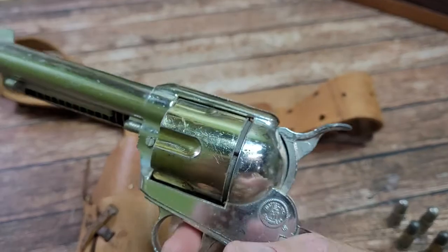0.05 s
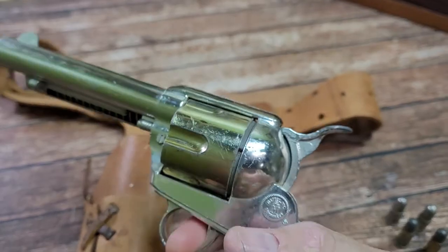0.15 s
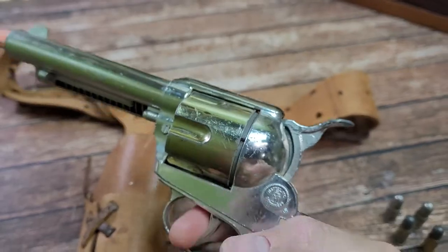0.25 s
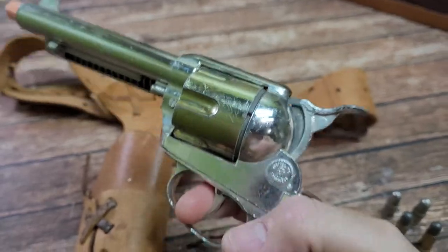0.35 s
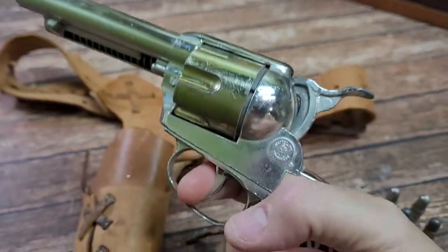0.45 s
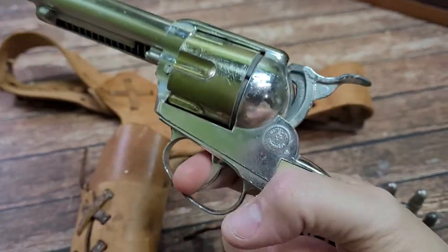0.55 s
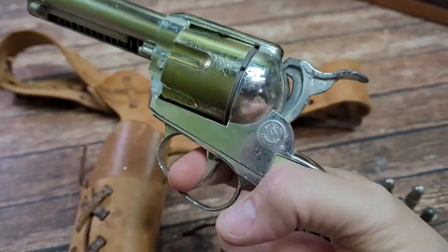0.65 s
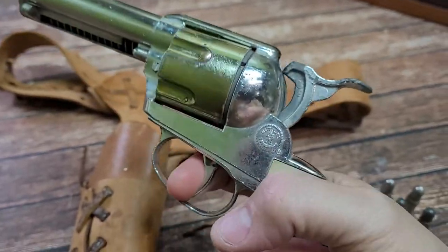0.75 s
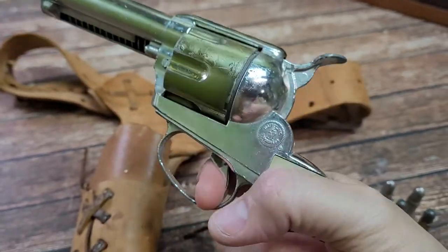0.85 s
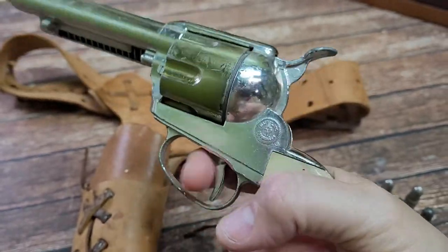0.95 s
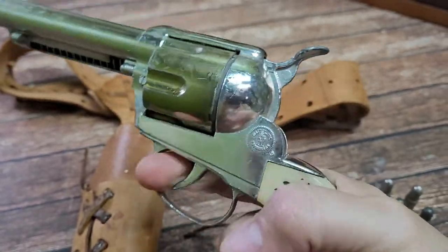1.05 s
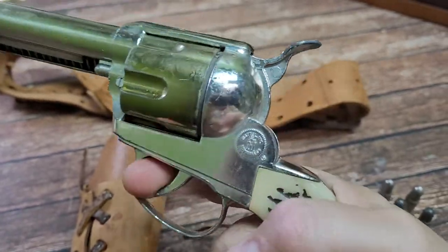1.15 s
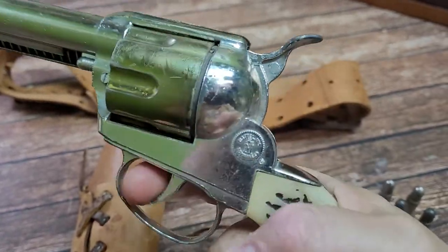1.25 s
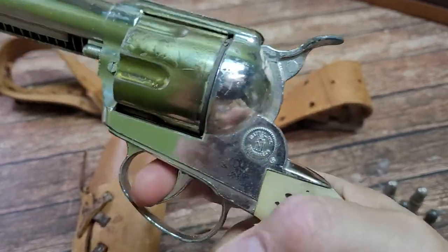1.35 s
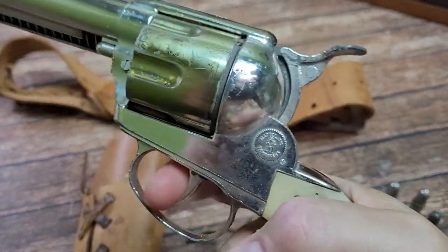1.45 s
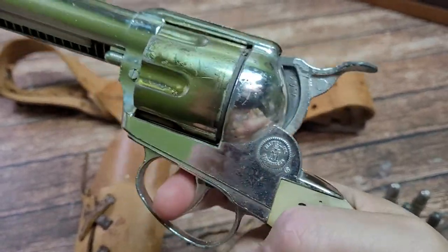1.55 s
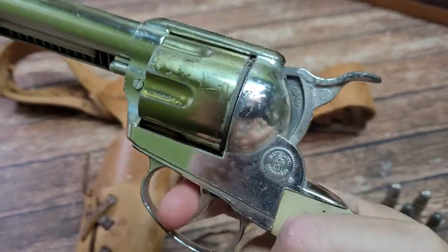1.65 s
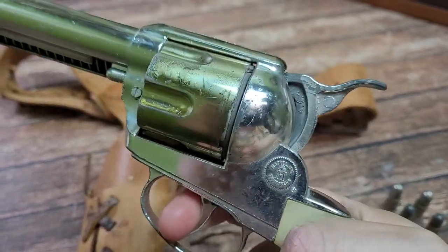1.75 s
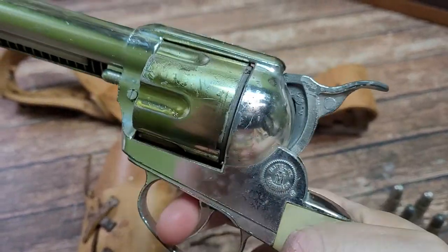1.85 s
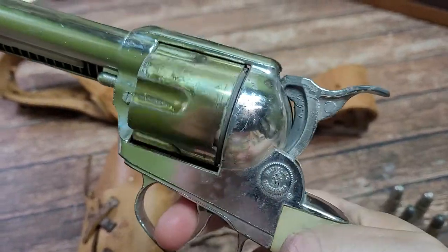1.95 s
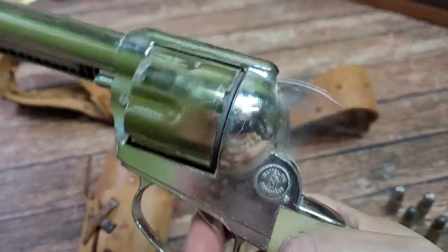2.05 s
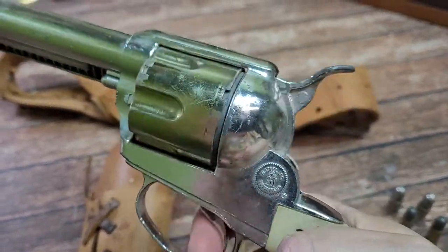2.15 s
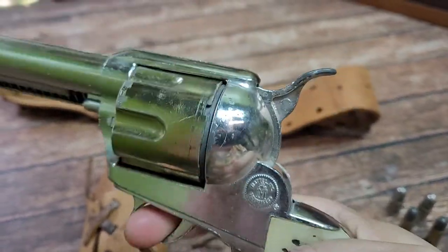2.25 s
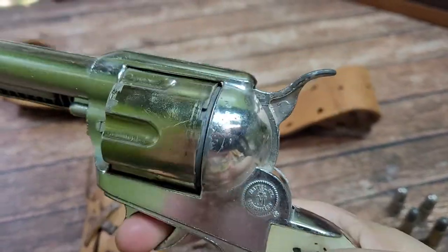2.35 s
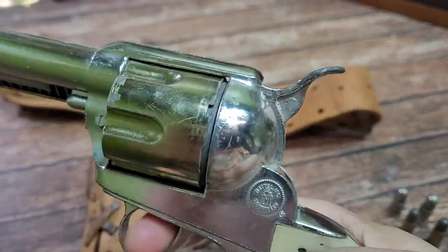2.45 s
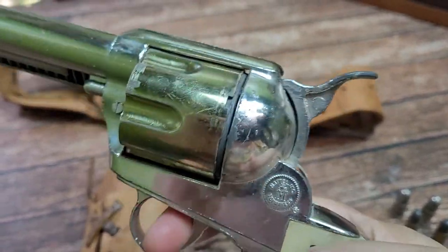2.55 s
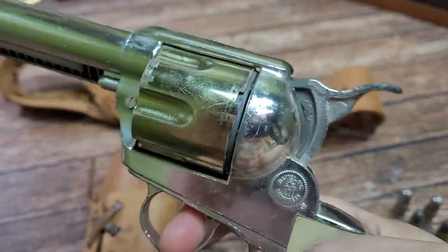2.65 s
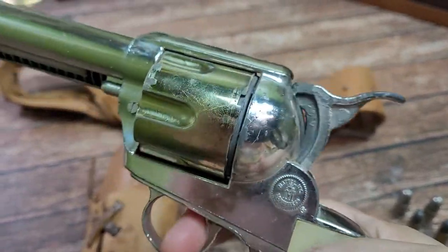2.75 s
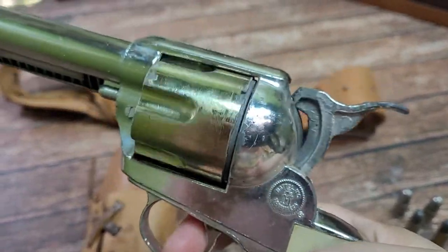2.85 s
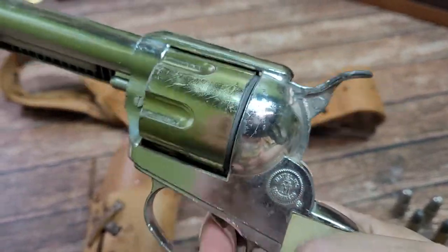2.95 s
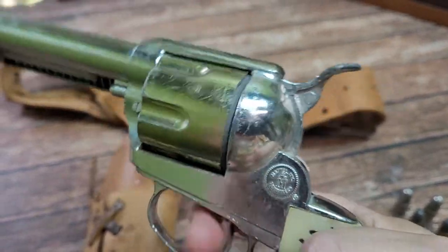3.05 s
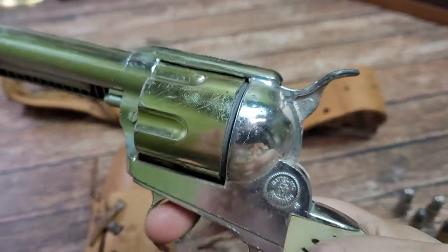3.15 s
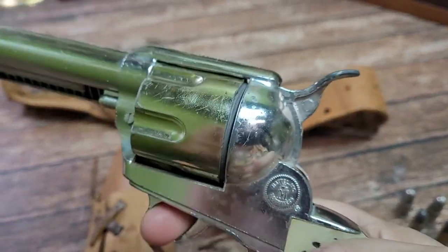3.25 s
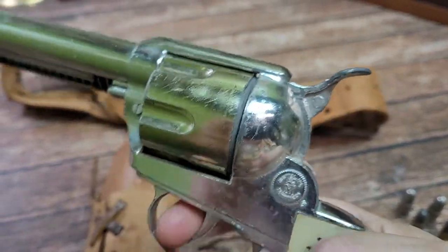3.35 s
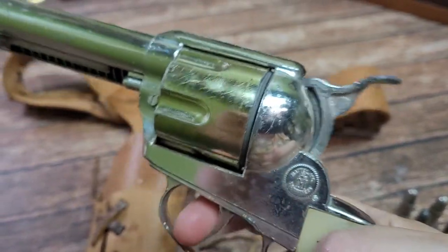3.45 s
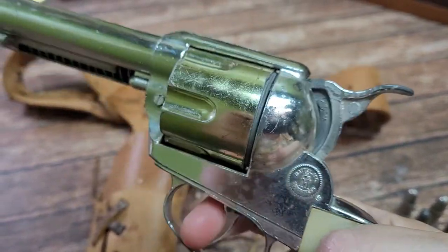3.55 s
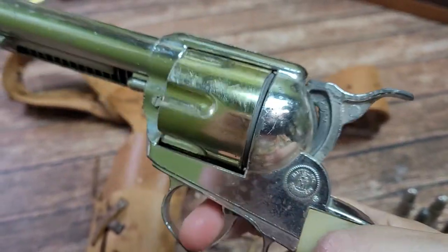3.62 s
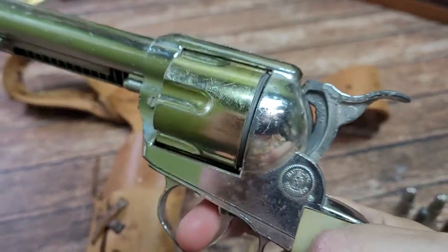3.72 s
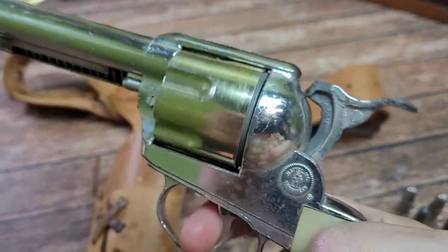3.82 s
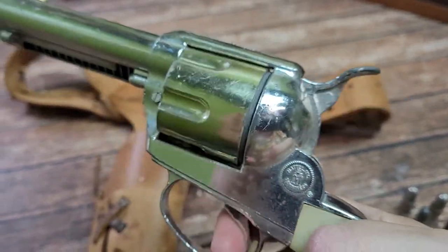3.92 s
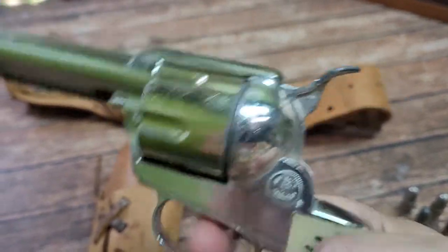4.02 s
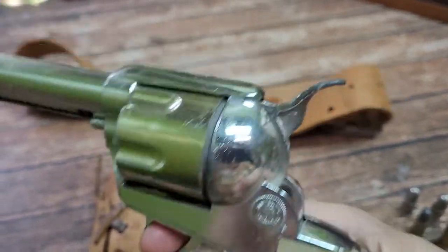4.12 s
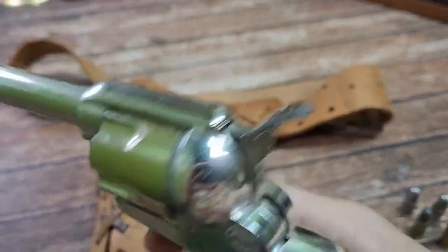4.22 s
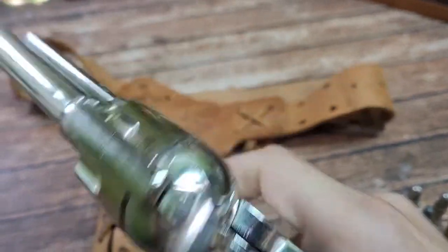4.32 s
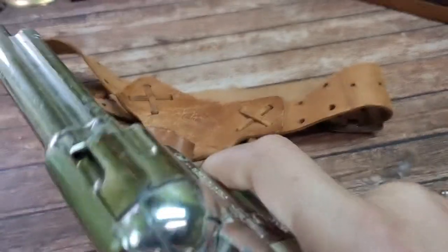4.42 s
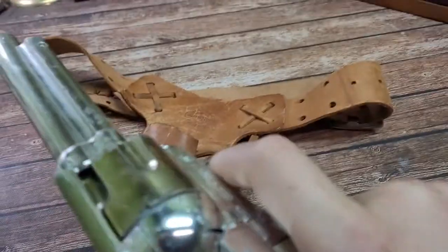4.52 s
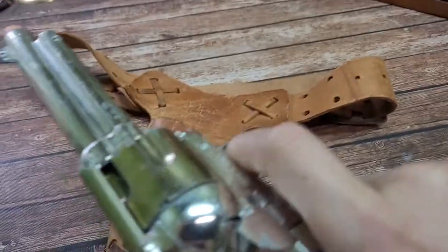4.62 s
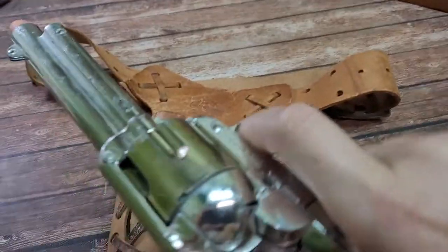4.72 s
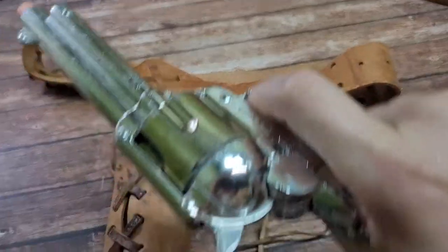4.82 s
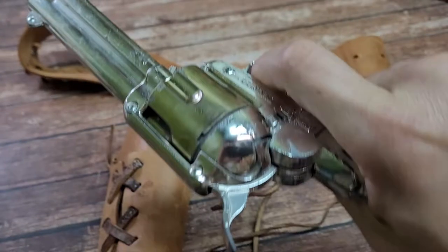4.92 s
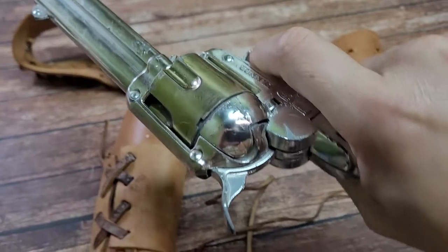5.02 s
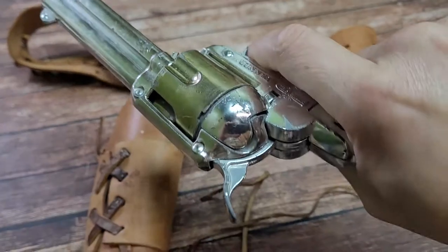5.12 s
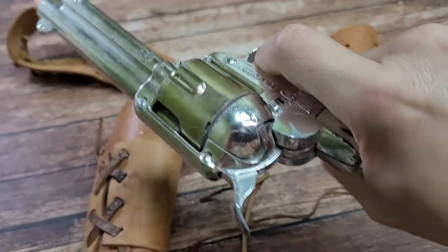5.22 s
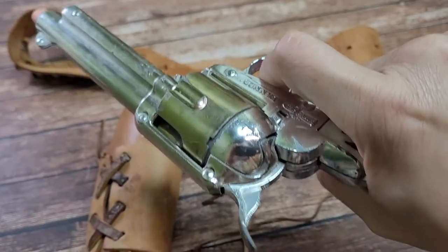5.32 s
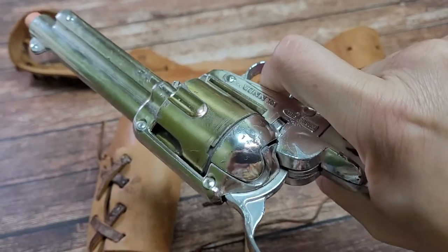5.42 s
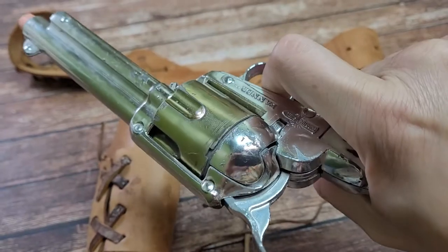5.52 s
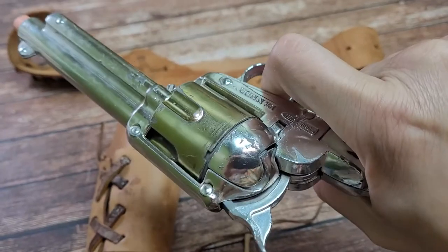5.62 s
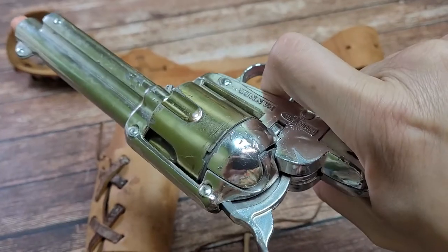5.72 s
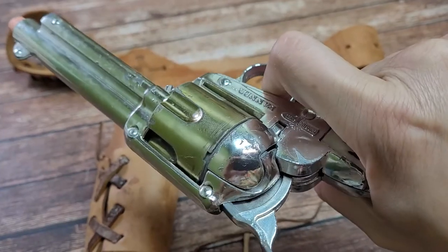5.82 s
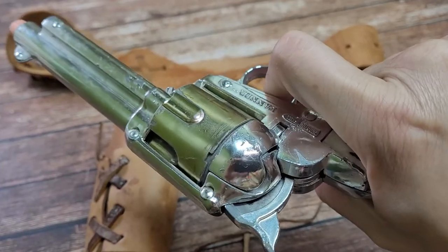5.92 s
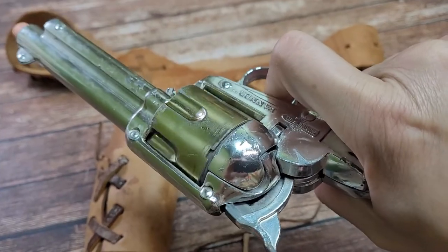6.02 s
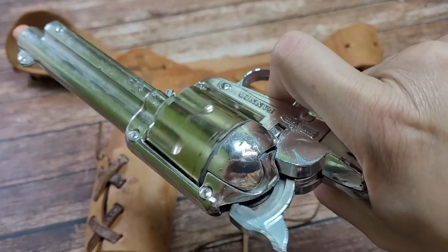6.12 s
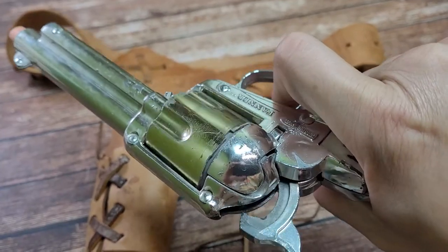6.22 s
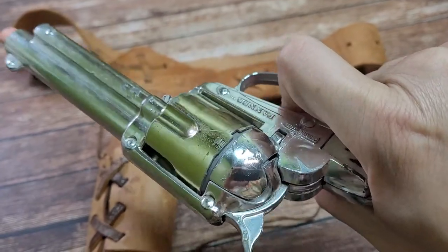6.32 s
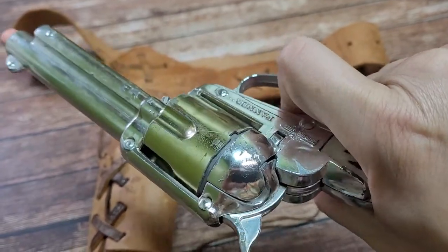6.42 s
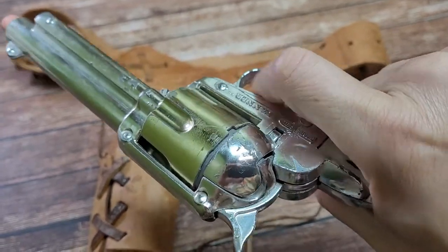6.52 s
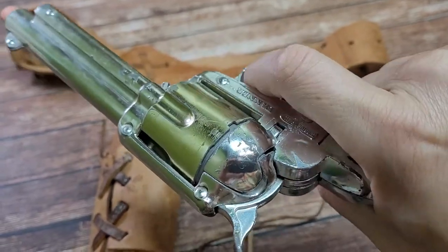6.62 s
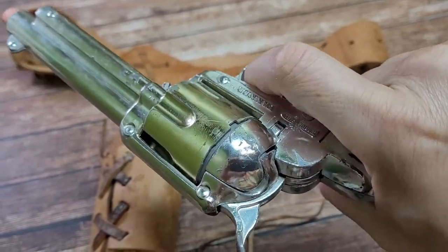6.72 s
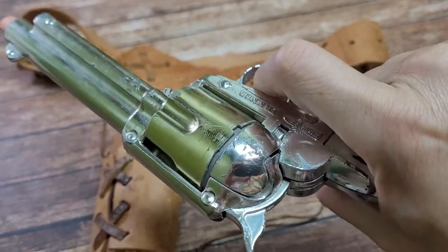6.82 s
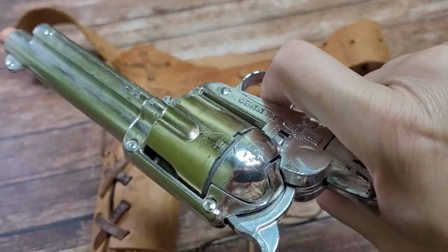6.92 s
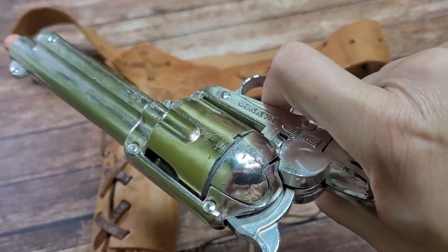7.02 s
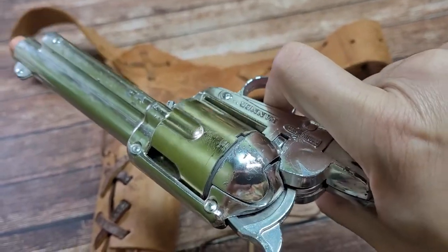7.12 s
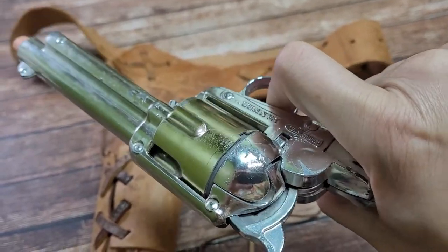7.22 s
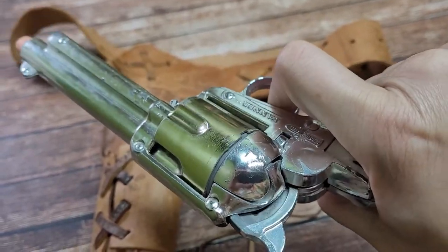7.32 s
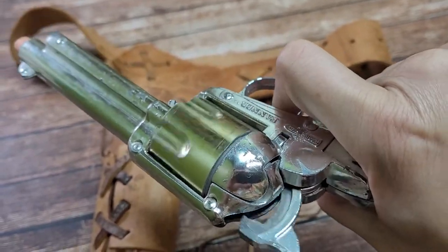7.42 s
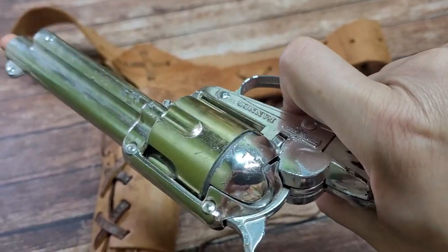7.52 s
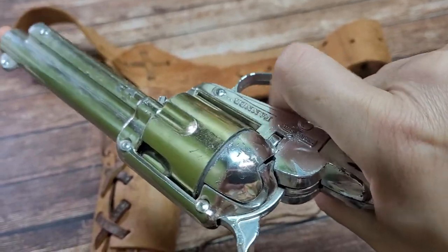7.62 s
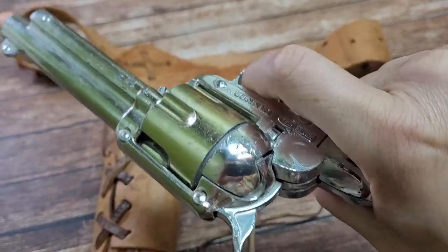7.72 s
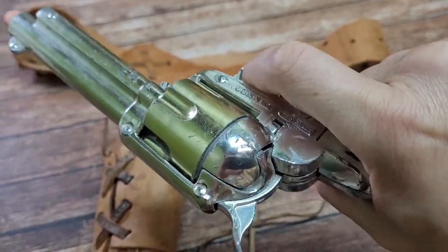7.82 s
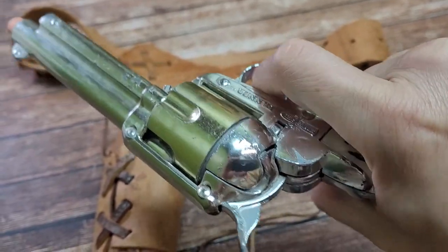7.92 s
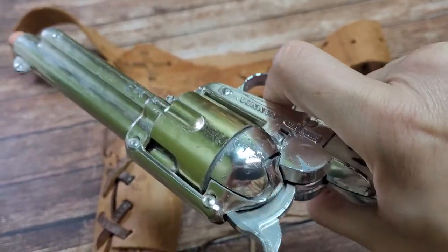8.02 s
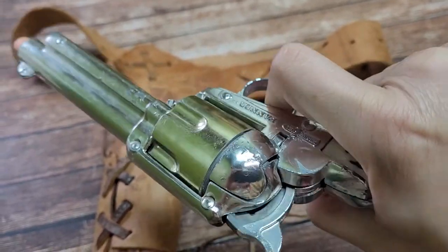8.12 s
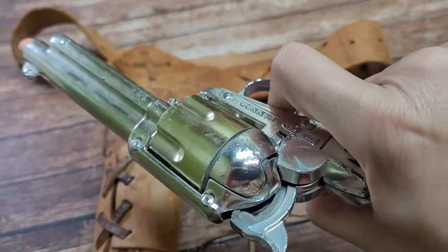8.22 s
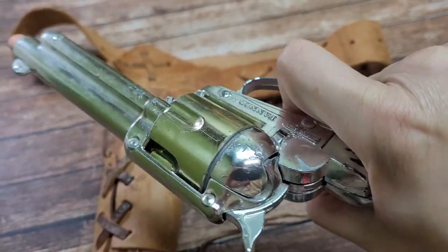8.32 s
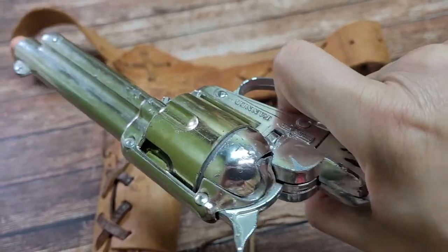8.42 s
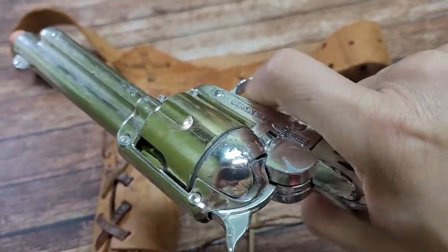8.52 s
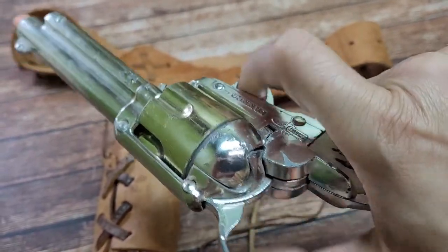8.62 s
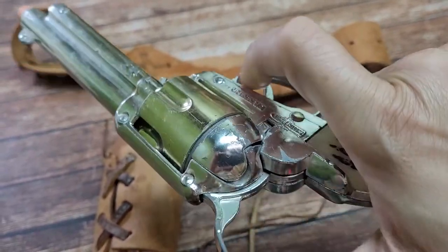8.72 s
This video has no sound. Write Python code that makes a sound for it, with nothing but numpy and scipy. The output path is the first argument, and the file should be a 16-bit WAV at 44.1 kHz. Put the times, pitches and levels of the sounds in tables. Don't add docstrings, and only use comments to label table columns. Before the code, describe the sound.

Close to a phone microphone in a small room, a die-cast toy revolver is dry-fired seven times: four snaps, a long quiet pause, then three more. Each is a loud, bright metallic crack with a tiny rebound rattle and short room tail, followed by little scraping clicks and a firm clack as the trigger returns. Skin rubs faintly on metal over low rumble and throbbing hum.

```python
import sys
import numpy as np
from scipy import signal
from scipy.fft import rfft, irfft
from scipy.io import wavfile
from scipy.ndimage import uniform_filter1d

SR = 44100
rng = np.random.default_rng(int(sys.argv[2]) if len(sys.argv) > 2 else 0)


def nominal_scale(level):
    x = np.asarray(level, float) / 20
    return 10 ** x


def output_pcm(signal):
    pcm = np.clip(np.atleast_2d(signal).T, -1, 1) * 32767
    wavfile.write(sys.argv[1], SR, np.round(pcm).astype(np.int16))


N = 386316

# t/s, blow level/dB, treble over mid/dB, signed height of left-port thump, late bounce level/dB
HAMMER_FALLS = [
    (0.7976, -6.5, 1, -0.088, -3),
    (2.0615, -6, 1.5, .08, -2),
    (2.9499, -5.5, 3, .06, -9.5),
    (3.8912, -6.5, 3.5, -.015, -8),
    (6.343, -6, 3, .085, -7.5),
    (7.4868, -6.5, 4.5, .05, -6.5),
    (8.3293, -5.5, 3.5, 0.037, -7),
]
# t/s after the fall, level/dB
HAMMER_BOUNCES = [
    (.0025, -8),
    (.0046, -4.5),
    (.0064, 1),
    (.0088, -4.5),
]
LATE_BOUNCE_S, THUMP_PEAK_S, FRAME_HZ = .0170, .0198, 2750
SNAP_ROOM_DB = -3.5
# f/Hz, level/dB, t60/s
METAL_MODES = [(3700, -5, 0.0058), (4500, -1, 0.0076), (6200, -16, .006), (7590, 0.5, 0.0089),
               (10000, -3.5, 0.0052), (10970, -1, .006), (13200, -7, .005)]
# f/Hz, level/dB
CRACK_SPECTRUM = [(300, -28.5), (700, -22.5), (1200, -13.5), (2000, -11), (3000, -8.5), (7500, -1.5),
                  (12000, -7.5), (16000, -12.5)]
# t/s, peak level/dB, treble over mid/dB, f/Hz
SEAR = [(0.7885, -23, -14.5, 2108), (1.9587, -42, -19, 2320), (2.0453, -44, -10.5, 2590),
        (2.9218, -36.5, -9.5, 2210), (2.9394, -22.5, -12, 2010), (3.8814, -35.5, -7, 2050),
        (5.2275, -39.5, 18, 3210), (5.2306, -40, -9.5, 2200), (5.372, -40, -10, 2245),
        (6.1734, -46, .5, 2470), (6.1887, -37, -16, 1950), (8.3204, -35, -25.5, 1680)]
# t/s, peak level/dB, treble over mid/dB, f/Hz
PAWL = [(0.9378, -31.5, 3.5, 2900), (0.984, -39.5, -11, 2310), (0.9885, -35, -14, 3140),
        (1.009, -27.5, -4, 2980), (2.209, -25.5, -3.5, 4350), (2.212, -33.5, 4, 2840),
        (2.2626, -28, -3, 2850), (3.0802, -23, -1.5, 4250), (3.0965, -35, 1, 3740),
        (3.112, -29.5, -6.5, 2780), (3.1461, -27, -9, 2850), (3.1627, -26, -16, 2930),
        (4.0493, -24, 1, 4170), (4.053, -30.5, -13.5, 2840), (4.067, -24, -.5, 2920),
        (4.0815, -28, -6, 2700), (4.0875, -32, -6, 2400), (6.5139, -27, 3.5, 4400),
        (6.5429, -31, -11, 2880), (6.5645, -36, -12, 2900), (6.57, -29, -3, 3200),
        (7.6586, -30, -7.5, 2770), (7.7004, -29, -2, 3150), (8.495, -35, -5, 2820),
        (8.5252, -31.5, -11, 2700), (8.5467, -34.5, -.5, 3260), (8.5494, -37, -25, 2230)]
# t/s, peak level/dB, treble over mid/dB, f/Hz
TRIGGER = [(1.0182, -15.5, -1.5, 3050), (1.0264, -11.5, 12, 3160), (2.2722, -14, -5.5, 3220),
           (2.2774, -10.5, 4.5, 3550), (3.1692, -11, 3.5, 4140), (3.17, -22, 2.5, 3240),
           (4.0913, -12.5, 1, 3340), (6.5748, -13, 3, 2900), (7.727, -28, -4, 3270),
           (7.7325, -23, -2.5, 3270), (7.7364, -11.5, 8, 3080), (8.567, -13, -1.5, 3120),
           (8.57, -21, 1.5, 3550)]
# t/s, peak level/dB, treble over mid/dB, f/Hz
LATCH = [(1.1105, -48, -2, 3360), (1.2711, -30, -6, 2930), (1.3494, -50, -7, 3680), (1.3578, -38, -4, 3490),
         (2.5038, -29.5, -1.5, 3460), (2.5639, -34, -13, 2750), (2.5921, -45, -18, 2410),
         (2.7058, -50.5, -6, 2213), (3.3477, -31.5, -3.5, 2990), (3.417, -38.5, -26.5, 2560),
         (3.4386, -46.5, -10, 2660), (6.8074, -31.5, -1, 2780), (6.8711, -52, -16, 2850),
         (6.8944, -56, -2, 2630), (6.968, -50, -6, 2330), (7.9372, -29.5, 1, 3720),
         (7.9941, -29.5, -14.5, 2630), (8.019, -46.5, 3, 3500), (8.0606, -41, -4.5, 2720),
         (8.0634, -52, -7, 2710)]
# t/s, peak level/dB, f/Hz
TOUCHES = [(0.0462, -52, 2927), (0.0488, -50, 2680), (0.0631, -49, 2130), (0.6091, -56.5, 1540),
           (0.6213, -60, 1260), (0.6441, -54.5, 890), (0.6579, -57, 1040), (0.7637, -56, 1360),
           (0.7686, -57.5, 1040), (1.9952, -58, 1700), (2.0, -56, 2460), (3.5386, -53.5, 1390),
           (3.6537, -55, 1800), (3.6632, -62.5, 2030), (5.412, -61.5, 1660), (5.7861, -60, 770),
           (6.2251, -50.5, 1370), (6.3186, -63.5, 1330), (6.9268, -58, 1950), (7.4524, -57, 2320)]
TOUCH_TREBLE_DB = -13
# left-right level/dB, room share level/dB
PLACES = [
    (6, -10.5),
    (2.5, -9),
    (4.5, -15),
    (2.5, -14),
    (2.5, -11),
]
# t/s, height, decay/s, swing f/Hz
POPS = [
    (1.5925, -0.021, 0.0018, 140),
    (1.5982, -.011, 0.00304, 30),
]
# f/Hz, t60/s
ROOM_DECAY = [(500, 0.47), (1300, 0.26), (3500, 0.32), (9000, .26), (15000, 0.19)]
# f/Hz, width/Hz, gain level/dB
LEFT_PORT = (2085, 450, 6)
# f/Hz, level/dB
RIGHT_PORT = [(1000, -1), (2400, -6), (4400, 1), (8000, 2.5), (15000, 2)]
# t/s at full pressure, level/dB, treble over mid/dB, time to fade 20 dB/s
STROKES = [(.07, -74, -7, .28), (.33, -79, -6, .9), (.6, -73, -5, .5), (.64, -68, -9, .14),
           (.785, -66, -9, .2), (1.29, -71, -8, .9), (1.59, -73, -14, .17), (1.97, -77, -2, .4),
           (2.04, -71, -3, .2), (2.53, -72, -7, 1.1), (2.91, -73.5, -5, .2), (3.37, -73.5, 0, .3),
           (3.66, -81, -8, 2), (4.3, -80, 1, 1.2), (4.53, -81, -1, .5), (4.75, -74, -5, .4),
           (4.9, -75.5, -11, 3), (5.24, -80, 4, .25), (5.39, -77, -11, .35), (5.54, -72, -6, .4),
           (5.8, -76.5, -7, .8), (6.11, -74, -5, .5), (6.19, -58, -4.5, .08), (6.32, -71, -14, .2),
           (6.83, -66, -5.5, .27), (7.41, -80, 1, .5), (7.48, -67, -6, .2), (7.98, -70, -4, .35),
           (8.19, -78, -6, 2)]
PRESS_DB_PER_S, REST_DB, REST_TREBLE_DB = 330, -95, -5
RATTLE_DB, RATTLE_TREBLE_DB, RATTLE_S, RATTLE_FADE_S = -73, 0, .36, .26
# f/Hz, level/dB
RUB_MID = [(700, -23.5), (1500, -3), (2200, -3.5), (2900, -8), (4500, -12), (6000, -38)]
# f/Hz, level/dB
RUB_TREBLE = [(3500, -32.5), (5000, -7), (7000, 1.5), (9000, -7.5), (12000, -9), (16000, -20)]
# from t/s, to t/s, level/dB
OVERLOAD = [
    (1.12, 1.59, -76),
    (2.36, 3.25, -77),
    (7.45, 7.85, -85),
]
# f/Hz, level/dB
HISS_SPECTRUM = [(4000, -29.5), (9000, -14.5), (11500, -5), (15100, -0.5), (16300, -5)]
HISS_DB = -92
# t/s, background level/dB
BACKGROUND_LEVEL = [(0.0, -59.5), (0.73, -58.5), (0.83, -63.5), (1.3, -64), (1.85, -66.5), (2.07, -64),
                    (2.46, -65), (3.07, -63), (3.4, -66), (4.1, -64), (4.54, -66.5), (5.02, -65),
                    (5.6, -60), (6.22, -59.5), (6.39, -63), (7.25, -68.5), (7.6, -62.5), (8.76, -66.5)]
# f/Hz, level per Hz/dB
RUMBLE = [(15, -36.5), (30, -10.5), (60, -3), (90, -6.5), (123, -9.5), (175, -17.5), (242, -10.5),
          (463, -21.5), (560, -34), (863, -31.5), (1190, -40.5), (2500, -53.5), (16000, -67)]
# f/Hz, left-right likeness
LIKENESS = [(60, 0.79), (240, 0.94), (950, 0.41), (3770, 0), (15000, -0.0)]
# f/Hz, left level/dB, right level/dB
HUM = [
    (57.84, -4, -3),
    (62.15, -13, -13),
    (115.67, -1, -3),
    (119.993, 1, 0),
    (231.34, -19, -17),
]
IN_STEP_S = 0.18
HUM_DB = 12.5
# f/Hz, level/dB
BAND_EDGE = [(15700, 0), (16050, -20.5), (16800, -27), (17100, -60)]


def snaps():
    near, far, thump = np.zeros((3, 2, N))
    t = np.arange(3000) / SR
    since_peak = t - THUMP_PEAK_S
    wobble = np.cos(2 * np.pi * 52 * since_peak) * np.exp(-(since_peak / 0.0098) ** 2)
    kick = -np.sin(2 * np.pi * 260 * t) * np.exp(-t / .0016)
    for s, db, treble_db, height, late_db in HAMMER_FALLS:
        for after_s, bounce_db in [(0, 0)] + HAMMER_BOUNCES + [(LATE_BOUNCE_S, late_db)]:
            x = tick(db + bounce_db, treble_db - 3.0, FRAME_HZ, .0017, -4.0)
            add(near, s + after_s, x * nominal_scale([[1.5], [-1.5]]))
            add(far, s + after_s, x * nominal_scale(SNAP_ROOM_DB))
        add(thump, s, np.outer([1, .08], height * wobble + .12 * kick))
    return near, far, thump


def tick(blow_db, treble_db, part_hz, crack_s, ring_db):
    t, hz = np.arange(1024) / SR, np.fft.rfftfreq(1024, 1 / SR)

    def step(f, edge_hz):
        return np.tanh(np.log((f + 1) / edge_hz) / .25) / 2

    def tilt(f):
        weak_db = 0.21 * (blow_db + 9) * (step(f, 8800) + .5)
        return nominal_scale(treble_db * step(f, 4500) + weak_db)

    part_db = 5.0 * np.exp(-(np.log((hz + 1) / part_hz) / .3) ** 2)
    burst = rfft(rng.standard_normal((2, 1024)) * np.exp(-t / crack_s))
    burst = burst / np.sqrt(uniform_filter1d(abs(burst) ** 2, size=28))
    crack = irfft(burst * nominal_scale(read(CRACK_SPECTRUM, hz) + part_db) * tilt(hz)) * (t < .018)

    f, db, t60 = np.transpose([(part_hz, 0, .006)] + METAL_MODES)[:, :, None]
    draw = rng.standard_normal((len(f), 4))
    turn = 2 * np.pi * f * (1 + 0.028 * draw[:, :1]) * t
    modes = nominal_scale(db + 3.5 * draw[:, 1:2] - 60 * t / t60) * tilt(f)
    ring = np.array([(modes * np.sin(turn + 2 * draw[:, k:k + 1])).sum(0) for k in (2, 3)])

    x = crack / abs(crack).max() + nominal_scale(ring_db) * ring / abs(ring).max()
    x = x * (1 - np.exp(-t / 0.00054))
    peak = np.sqrt(uniform_filter1d((x ** 2).mean(0), size=44).max())
    return nominal_scale(blow_db - 4.0) * x / peak


def clicks():
    near, far = np.zeros((2, 2, N))
    touches = [(s, db, TOUCH_TREBLE_DB, hz) for s, db, hz in TOUCHES]
    for rows, (pan_db, room_db) in zip((SEAR, PAWL, TRIGGER, LATCH, touches), PLACES):
        for s, db, treble_db, part_hz in rows:
            x = tick(db, treble_db - 6.5, part_hz, 0.0023, -3)
            add(near, s, x * nominal_scale([[pan_db / 2], [-pan_db / 2]]))
            add(far, s, x * nominal_scale(room_db))
    return near, far


def pops():
    out, t = np.zeros((2, N)), np.arange(800) / SR
    for s, height, decay_s, swing_hz in POPS:
        add(out[0], s, height * np.cos(2 * np.pi * swing_hz * t) * np.exp(-t / (2.94 * decay_s)))
    return out


def room(x):
    out, t, size = np.zeros((2, N)), np.arange(N) / SR, SR // 2
    for k in range(3):
        taps = np.zeros((2, size))
        at = np.arange(120, size - 12, 12) + rng.integers(0, 12, (2, (size - 121) // 12))
        np.put_along_axis(taps, at, rng.choice([-1., 1.], at.shape), 1)
        taps *= 1 - 0.61 * np.exp(-(t[:size] / 0.0069) ** 2)
        hz, s, z = signal.stft(taps, SR, nperseg=128)
        decay = nominal_scale(-60 * s / read(ROOM_DECAY, hz)[:, None])
        tail = signal.istft(z * decay, SR, nperseg=128)[1]
        turn = np.sqrt(2 / 3) * np.cos(np.pi * (1.7 * t + k / 3))
        out += signal.oaconvolve(x * turn, tail / np.linalg.norm(tail[0]), axes=1)[:, :N]
    return out


def ports(x):
    hz, width, peak_db = LEFT_PORT
    left = x[0] + nominal_scale(peak_db) * signal.lfilter(*signal.iirpeak(hz, hz / width, SR), x[0])
    grid = np.linspace(0, SR / 2, 65)
    colour = signal.firwin2(63, grid, nominal_scale(read(RIGHT_PORT, grid)), fs=SR)
    right = signal.oaconvolve(x[1], colour, "same")
    return np.array([left, right])


def rubbing():
    t, fine = np.arange(0, N / SR, .002), np.arange(N) / SR
    mid = nominal_scale(REST_DB) + 0 * t
    treble = nominal_scale(REST_DB + REST_TREBLE_DB) + 0 * t
    rattles = [(row[0] + RATTLE_S, RATTLE_DB, RATTLE_TREBLE_DB, RATTLE_FADE_S) for row in HAMMER_FALLS]
    for s, db, treble_db, fade_s in STROKES + rattles:
        mid = np.maximum(mid, stroke(t, s, db, fade_s))
        treble = np.maximum(treble, stroke(t, s, db + treble_db, fade_s))
    hiss = nominal_scale(HISS_DB) + sum(nominal_scale(db) * ((t > a) & (t < b)) for a, b, db in OVERLOAD)
    hiss = uniform_filter1d(hiss, size=7)
    mid, treble, hiss = (np.interp(fine, t, level) for level in (mid, treble, hiss))
    apart = [(100, 0), (20000, 0)]
    mid = mid * nominal_scale([[1.5], [-5.5]]) * noise(RUB_MID, apart, size=256, patchy_db=1.56)
    treble = treble * nominal_scale(1.0) * noise(RUB_TREBLE, apart, size=256, patchy_db=2.4)
    hiss = hiss * nominal_scale([[6.0], [-9.0]]) * noise(HISS_SPECTRUM, apart, size=256, patchy_db=2.0)
    return mid + treble + hiss


def stroke(t, s, db, fade_s):
    return nominal_scale(db - np.where(t < s, PRESS_DB_PER_S * (s - t), 20 * (t - s) / fade_s))


def background():
    t = np.arange(N) / SR
    from_step = t - IN_STEP_S
    hum = sum(nominal_scale([[left_db], [right_db]]) * np.cos(2 * np.pi * hz * from_step)
              for hz, left_db, right_db in HUM)
    beat_hz = HUM[3][0] - HUM[2][0]
    beat = np.cos(2 * np.pi * beat_hz * from_step)
    rumble = nominal_scale(7.5 + 1.5 * beat) * noise(RUMBLE, LIKENESS, size=1024, patchy_db=1.3)
    s, level_db = np.transpose(BACKGROUND_LEVEL)
    return nominal_scale(np.interp(t, s, level_db)) * (rumble + nominal_scale(HUM_DB) * hum)


def noise(spectrum, likeness, size, patchy_db):
    hz = np.fft.rfftfreq(size, 1 / SR)
    a, b, c, d, patches = rng.standard_normal((N * 4 // size + 5, len(hz), 5), dtype=np.float32).T
    patches = uniform_filter1d(uniform_filter1d(patches, size=8, axis=0), size=10, axis=1)
    same = np.clip(read(likeness, hz), -1, 1)[:, None]
    left = a + 1j * b
    right = same * left + np.sqrt(1 - same ** 2) * (c + 1j * d)
    level_db = read(spectrum, hz)[:, None] + patchy_db * patches / patches.std()
    z = np.array([left, right]) * nominal_scale(level_db)
    x = signal.istft(z, nperseg=size, noverlap=size * 3 // 4)[1][:, :N]
    return x / x.std()


def read(points, hz):
    f, value = np.transpose(points)
    return np.interp(np.log(hz + 1), np.log(f + 1), value)


def add(mix, s, sound):
    part = mix[..., round(s * SR):][..., :sound.shape[-1]]
    part += sound[..., :part.shape[-1]]


def scene():
    click, click_far = clicks()
    snap, snap_far, thump = snaps()
    gun = click + snap + room(click_far + snap_far)
    return ports(gun + rubbing()) + thump + pops() + background()


def top_cut(x):
    return signal.sosfilt(signal.butter(12, 16980, fs=SR, output="sos"), x)


def record(dry):
    grid = np.linspace(0, SR / 2, 513)
    edge = signal.firwin2(255, grid, nominal_scale(read(BAND_EDGE, grid)), fs=SR)
    limited = 1.457 * np.tanh(dry / 1.488)
    mix = signal.oaconvolve(limited, edge[None], "same")
    return top_cut(mix)


dry = scene()
out = record(dry)
output_pcm(out)
```